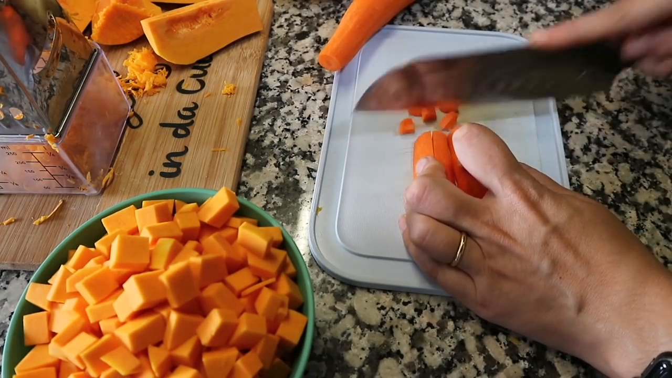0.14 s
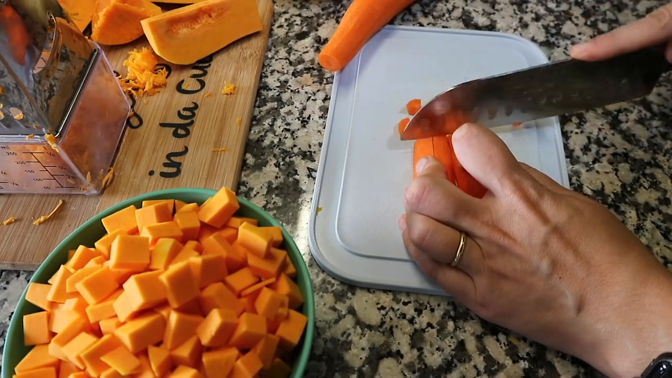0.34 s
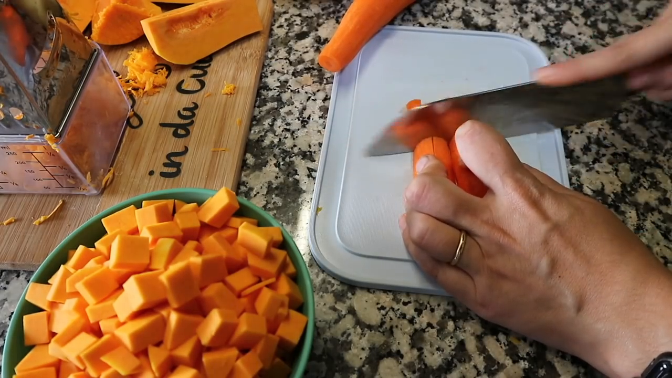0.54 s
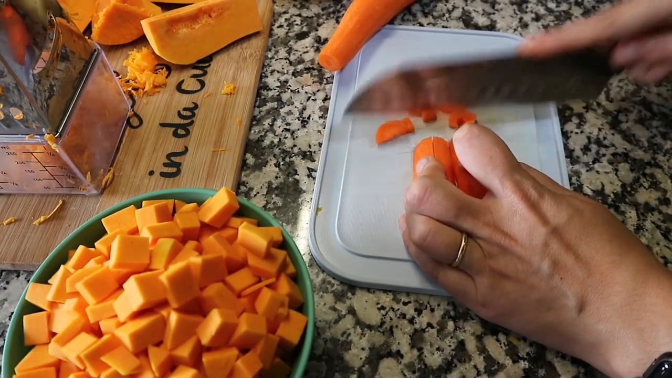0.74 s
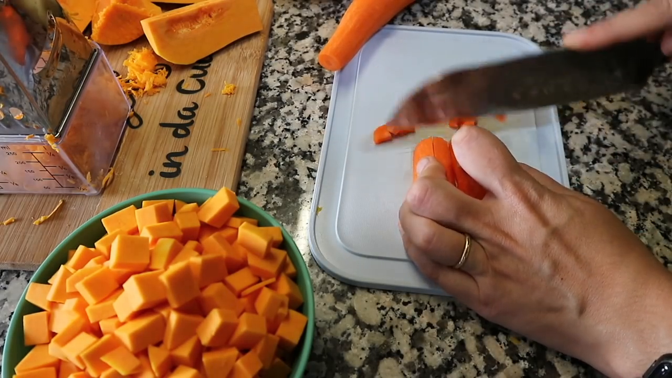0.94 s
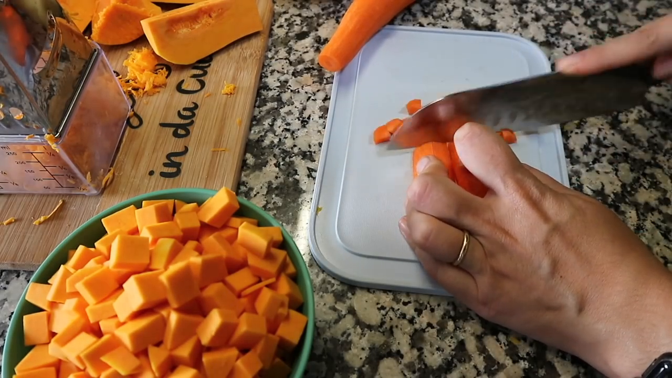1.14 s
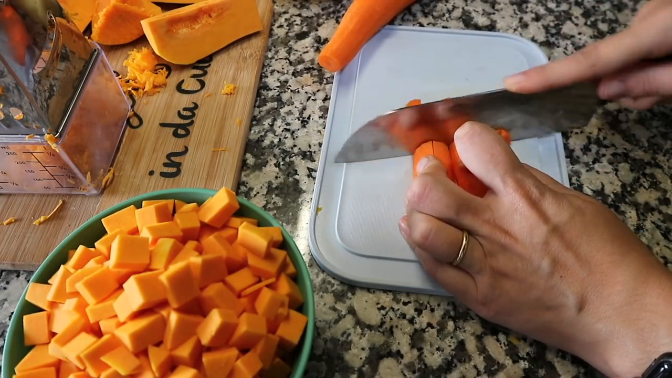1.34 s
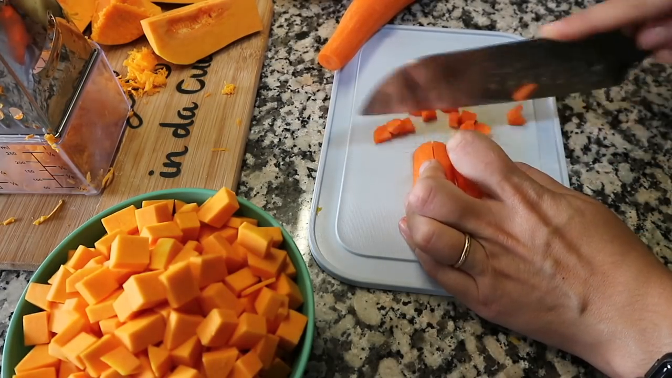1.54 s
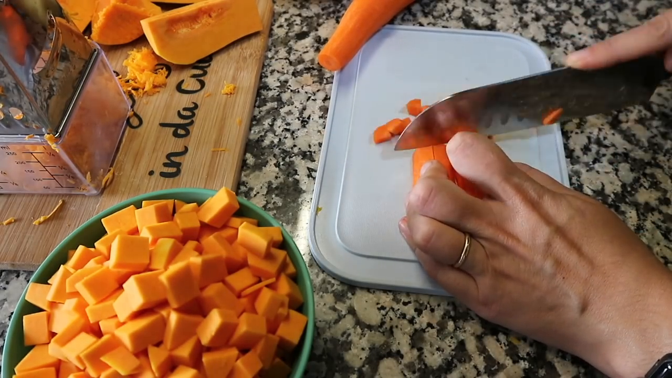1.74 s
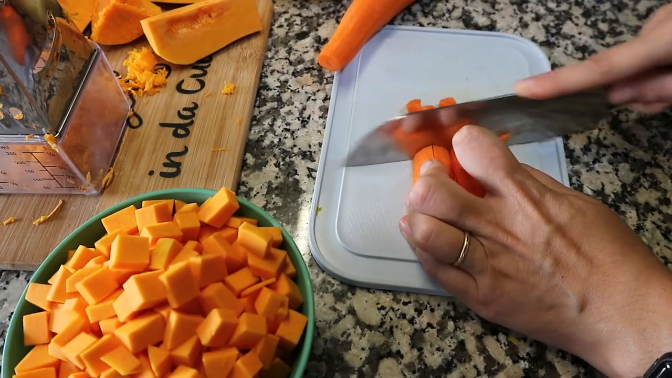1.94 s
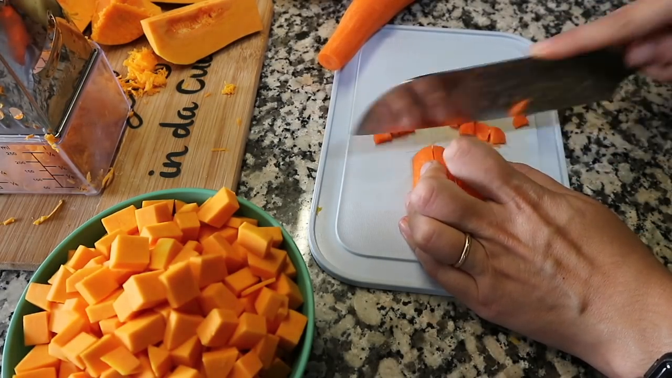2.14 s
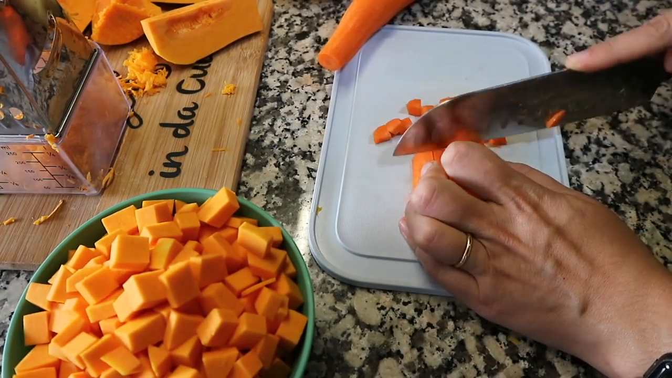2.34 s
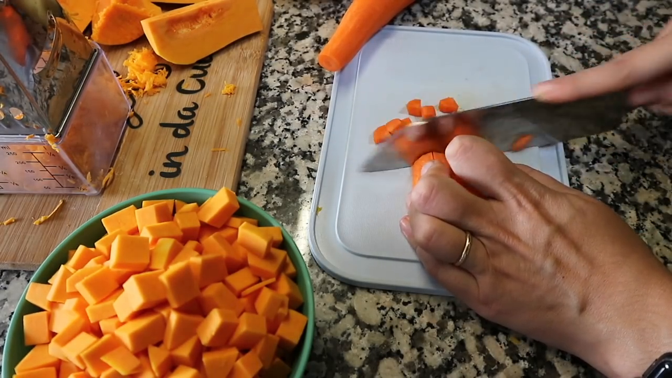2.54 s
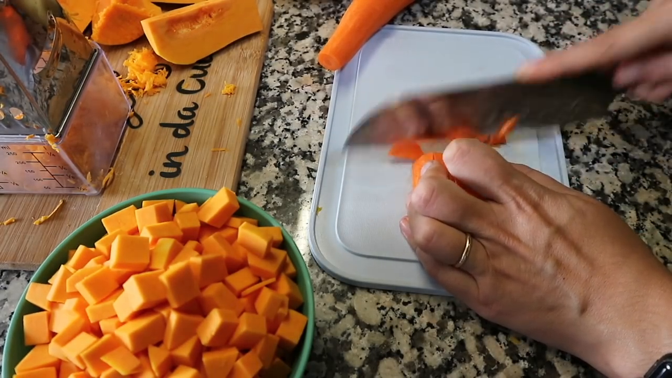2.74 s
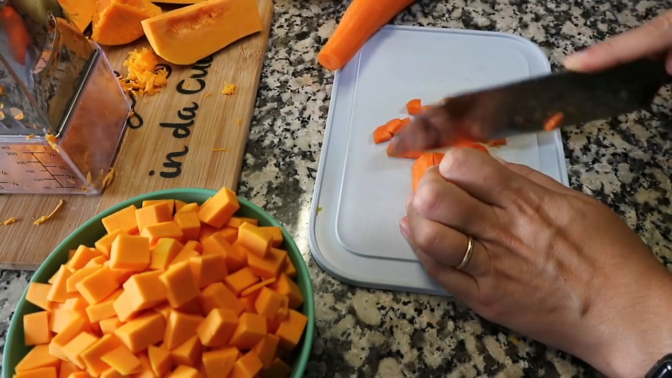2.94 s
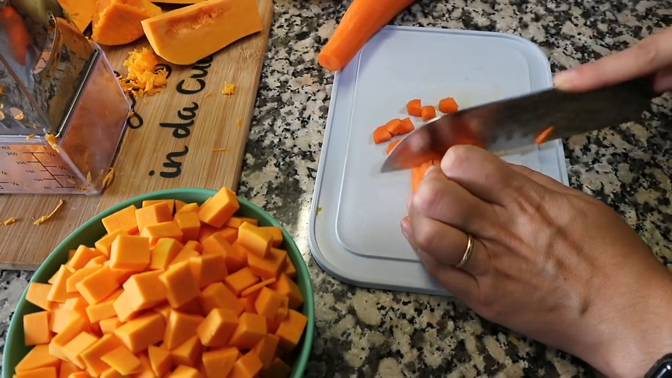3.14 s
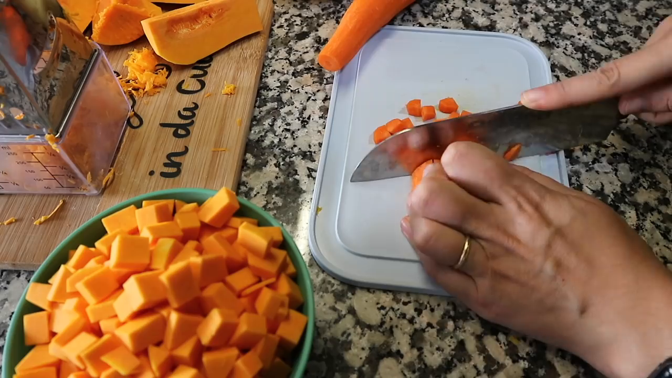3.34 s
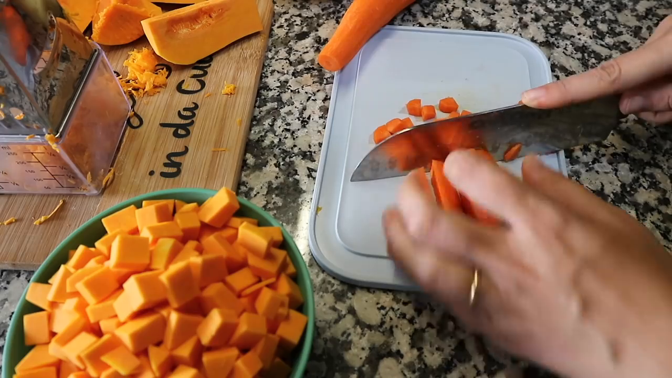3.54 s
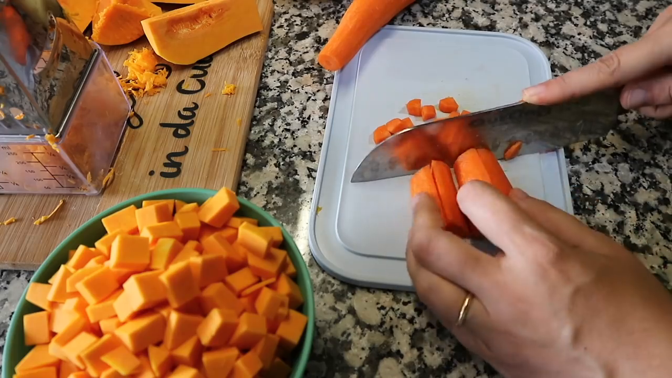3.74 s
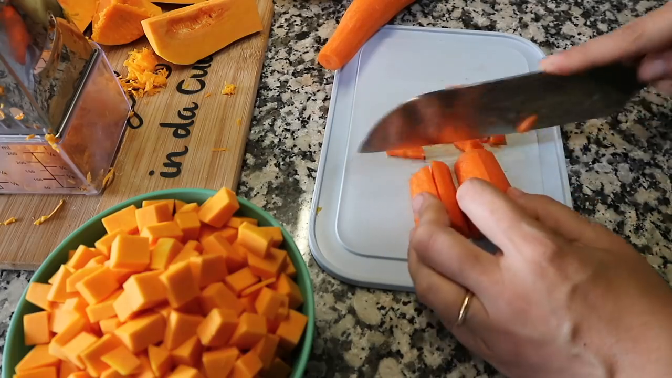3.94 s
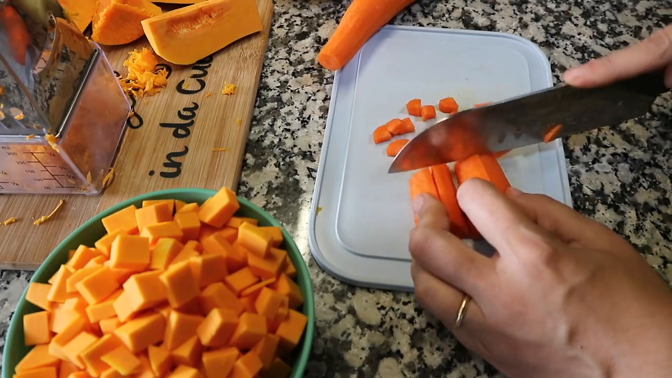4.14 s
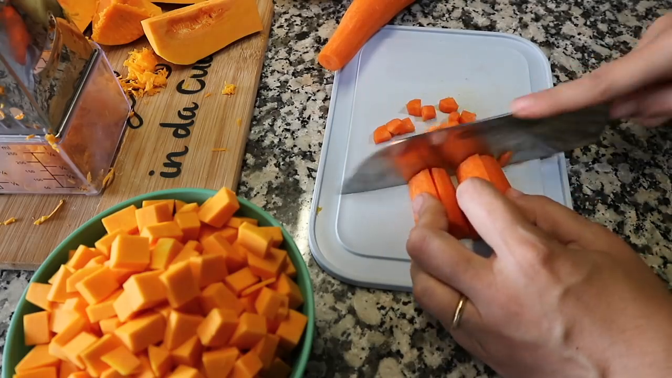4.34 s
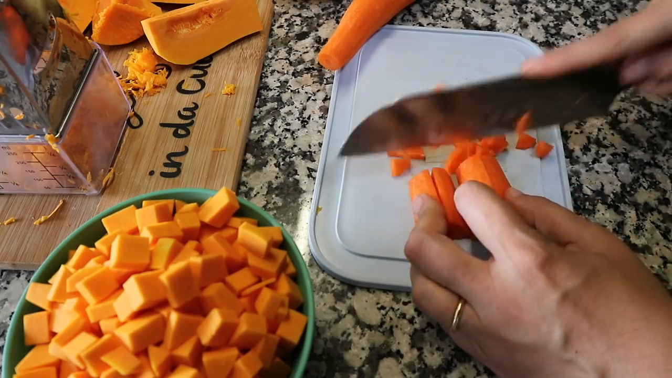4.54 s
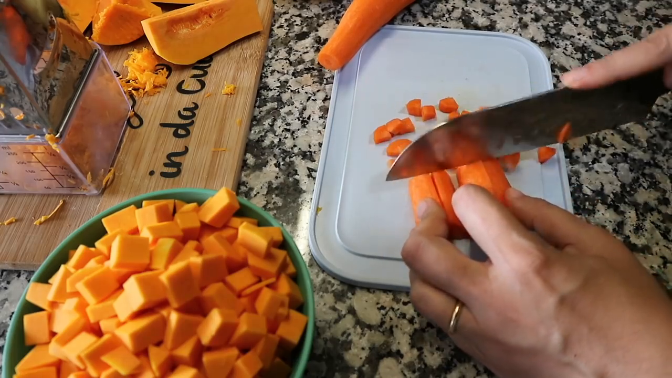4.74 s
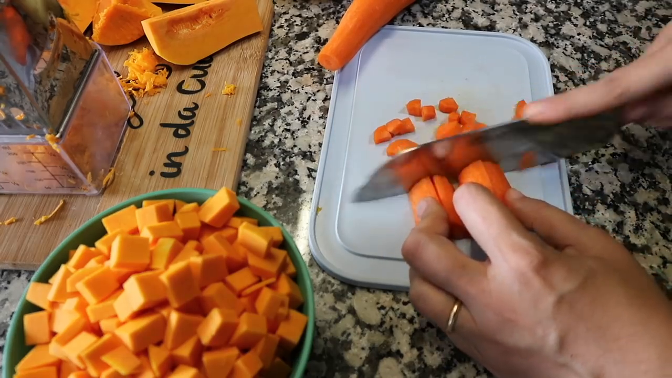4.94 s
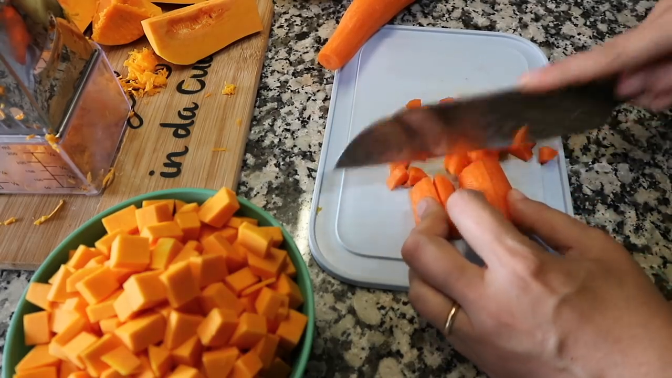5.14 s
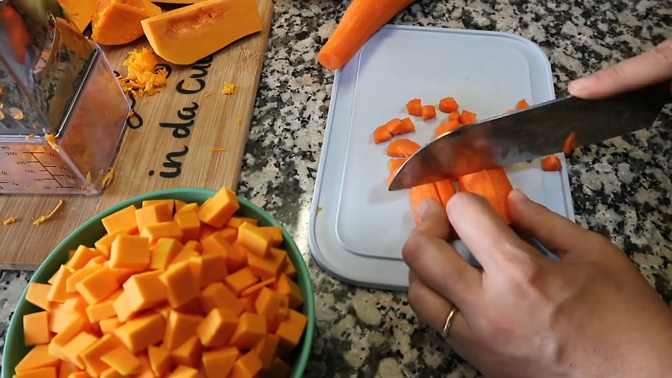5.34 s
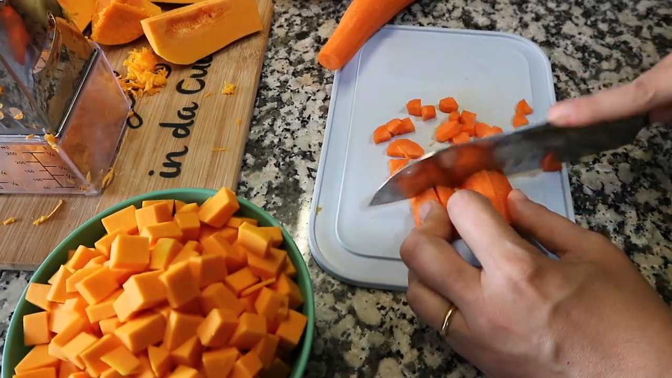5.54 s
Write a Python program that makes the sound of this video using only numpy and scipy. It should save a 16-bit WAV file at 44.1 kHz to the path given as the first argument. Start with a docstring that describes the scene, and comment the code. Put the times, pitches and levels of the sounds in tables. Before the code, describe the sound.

A sharp knock of a knife on a thin plastic cutting board opens the sound. Eight strokes through carrot follow at an even pace. In each, the blade lightly touches the carrot, crunches through it with rising loudness and clacks on the board. The knocks fall at about 0.6, 1.3, 1.9, 2.6, 3.3, 4.3 and 5.0 seconds; those at 0.6, 2.6 and 5.0 are the hardest, the one at 1.9 is softer. Fibres snap crisply near 1.9, 3.3 and 4.9 seconds, and the blade slides on briefly after 4.3. The last stroke crunches and snaps around 5.5 seconds and ends before its knock. The microphone is close, and the small, hard kitchen rings very briefly after each hit. Underneath, an appliance gives a low, slightly throbbing hum with a soft fan hiss throughout.

```python
"""A chef's knife rocks through carrot sticks on a thin plastic board lying on a stone counter.
A knock on the board opens the scene. Eight strokes follow: the edge touches the carrot, crunches through
ever louder, snaps fibres and knocks on the board, at times sliding on. The last ends before its knock.
Throughout, a small hard kitchen rings briefly, an appliance hums and its fan hisses.
Two close microphone ports listen; after loud knocks the gain drops and creeps back."""
import sys
import numpy as np
from scipy import signal
from scipy.fft import rfft, irfft, next_fast_len
from scipy.io import wavfile
from scipy.ndimage import uniform_filter1d

SR = 44100
rng = np.random.default_rng(int(sys.argv[2]) if len(sys.argv) > 2 else 0)


def generate_wav(sig):
    """Save sig (samples, or channels by samples) to the path in sys.argv[1] as 16-bit PCM at SR."""
    pcm = np.round(np.clip(np.atleast_2d(sig).T, -1, 1) * 32767).astype(np.int16)
    wavfile.write(sys.argv[1], SR, pcm)


N = 245718
RUN_IN = 8820   # samples before time zero
LONG = N + RUN_IN
FFT_SIZE = next_fast_len(LONG + SR // 2)
TIME_S = (np.arange(LONG) - RUN_IN) / SR
BIN_HZ = np.maximum(np.arange(FFT_SIZE // 2 + 1) * SR / FFT_SIZE, 1)

# Cuts. Each row: entry and board arrival in seconds, crunch at each in dB, final rush's share of the
# climb, fizz boost in dB, buzz at entry in dB, buzz tilt in dB per octave, slide level in dB.
STROKES = [(0.427, 0.566, -63.5, -19.5, 0.53, 1, -50, -4, -64),
           (1.112, 1.31, -55, -31, 0.4, 3.5, -46.5, -2, -78),
           (1.796, 1.93, -62, -27.5, 0.35, 1.5, -49, 9.5, -60),
           (2.413, 2.577, -59.5, -24, .5, 1, -52.5, 5, -62), (3.066, 3.272, -55, -25, .55, 1, -54, 1, -47),
           (4.17, 4.331, -56.5, -27, .4, 1, -54.5, -5, -36),
           (4.81, 4.98, -50.5, -25.5, 0.2, -1, -59.5, -9, -52),
           (5.42, 5.6, -48.5, -33, 0.33, -2.5, -61.5, -13, -60)]
# Bursting cells' spectrum. Each row: frequency in Hz, relative density in dB.
CRUNCH_SPECTRUM = [(1470, -19.5), (2500, -4), (3230, -12.5), (3510, -5.5), (5290, -12.5), (6320, -9),
                   (7850, -11), (13100, -19), (14900, -18), (15900, -27.5)]
# Board resonances under the cut. Each row: centre in Hz, width in Hz, gain in dB.
BUZZ_BANDS = [(1444.6, 124, 2.5), (1735, 160, 2), (2380, 350, -1), (910, 170, -7)]
# Edge hits board. Each row: start in seconds, level in dB, hardness in dB per octave, crack level in dB,
# lag of 1 kHz behind 4 kHz in ms, low-mode gain in dB, ring time as a share of the free board's.
KNOCKS = [(-.034, -9, -2, -13, 0.885, 3, 2), (.562, 2.5, 3, -28, 2.2, 8.5, 0.93),
          (1.305, -3.5, -3, -17.5, 0.9, 0.5, 0.85), (1.926, -14, -6.5, -20, 1.5, 1.5, 0.47),
          (2.580, 5, 2, -17.5, 0.758, -0.5, 0.72), (2.841, -24.5, -3.5, -55, 0.52, -2, .6),
          (3.274, -1, -1, -11, 0.715, -7.5, 1), (4.33, -5.5, -0.5, -15.5, 0.57, 3.5, .7),
          (4.445, -30, 2, -64, 0.5813, -3, 0.5), (4.974, 1.5, 1, -11.5, 0.565, -6, 0.97)]
# Impact spectrum before the hardness tilt. Each row: frequency in Hz, relative density in dB.
CLACK_SPECTRUM = [(200, -29.5), (400, 3), (640, 1.5), (1150, 3), (1550, 1.5), (2150, 1), (2700, -1),
                  (3600, -8), (5000, -29.5), (9000, -33.5), (16000, -45)]
# Free board's modes. Each row: frequency in Hz, gain in dB, T60 in seconds.
BOARD_MODES = [(322, -5, 0.043), (430.4, -4, 0.033), (621.5, -6, 0.086), (774, -3.5, 0.021),
               (967, -0.5, 0.02), (1230, -3.5, 0.052), (1492, -5, 0.04), (1689, 0.5, 0.082),
               (2100, -5, 0.038), (2504, -4.5, 0.039), (2804, -5.5, 0.036), (3457, -7, .02)]
# Edge lands on carrot. Each row: start in seconds, scrape peak in dB, blade pitch in Hz, tap gain in dB.
TOUCHES = [(0.368, -36.5, 3900, 10), (1.0458, -35.5, 6070, 11), (1.735, -37, 3966, 13),
           (2.349, -42.5, 3400, 11), (3.013, -41.5, 3100, 7), (3.7244, -49, 3075, 4),
           (4.0933, -43.5, 3500, 21), (4.7554, -35, 3400, 0), (5.3632, -33.5, 6260, -10)]
# Breaking fibres. Each row: start in seconds, nominal peak in dB.
SNAPS = [(0.5302, -22), (1.1288, -49), (1.8013, -40), (1.9066, -13), (1.9164, -14), (2.4379, -43),
         (3.2126, -31), (3.2405, -31), (3.2668, -4), (4.186, -36), (4.2904, -20), (4.8165, -37),
         (4.8991, -21.5), (4.911, -16), (4.9397, -19), (4.948, -10.5), (4.9569, -16), (5.434, -35),
         (5.5358, -12.5), (5.546, -17), (5.5585, -11)]
# Direct sound's phase at the ports. Each row: frequency in Hz, left lead in radians.
PORT_LEAD = [(1500, 0), (4000, -.2), (8000, -.9), (12000, -1.7), (16000, -2.6)]
# Direct sound's width. Each row: frequency in Hz, left-right correlation.
NEAR_CORRELATION = [(300, 0.95), (2400, 1), (4400, 0.82), (8000, 0.23), (15000, 0.27)]
# Kitchen decay. Each row: frequency in Hz, T60 in seconds.
ROOM_DECAY = [(250, 0.25), (660, 0.24), (1740, 0.27), (4590, 0.28), (12100, 0.24)]
# Reflections' spectrum. Each row: frequency in Hz, relative gain in dB.
ROOM_SPECTRUM = [(300, 5.5), (800, 3), (1700, 2.5), (3200, -1.5), (6000, -1.5), (14000, -0.5)]
# Reflections' width. Each row: frequency in Hz, left-right correlation.
ROOM_CORRELATION = [(60, 0.99), (130, 0.96), (290, 0.94), (640, 1), (1410, 0.98), (3100, 0.93),
                    (6820, 0.38), (15000, -0.51)]
# Set curve of the noise-like hum. Each row: time in seconds, pitch in Hz, level before the throb in dB.
HUM_CURVE = [(0.0, 120.2, -48), (0.06, 121, -37.5), (1.05, 125, -30.5), (1.13, 112.5, -49.5),
             (1.27, 131, -25), (1.49, 130, -37.5), (1.95, 120, -42), (2.0, 129, -35), (2.05, 126, -42),
             (2.09, 108.1, -54), (2.23, 125, -35.5), (2.37, 115, -34.5), (3.16, 113, -35),
             (3.37, 127, -45.5), (3.47, 109, -40), (3.85, 125, -42.5), (3.91, 113, -38), (4.24, 129, -43.5),
             (4.31, 122, -45), (5.04, 125.4, -36), (5.32, 117, -47.5), (5.37, 132, -43.5),
             (5.46, 124, -44.5), (5.57, 132, -43)]
# Fan noise spectrum. Each row: frequency in Hz, relative density in dB.
FAN_SPECTRUM = [(15, -71), (25, -31), (48, -25), (123, -5.5), (141, -9), (165, -18), (195, -15),
                (269, -20.5), (334, -21), (573, -25.5), (814, -21), (883, -24.5), (1290, -22.5),
                (2460, -35.5), (15900, -71)]
# Fan noise width. Each row: frequency in Hz, left-right correlation.
FAN_CORRELATION = [(60, 1.0), (130, 1.0), (290, 0.96), (640, 0.97), (1410, 0.97), (3100, 0.42),
                   (6820, -0.34), (15000, -0.72)]
# Appliance whines. Each row: centre in Hz, width in Hz, level in dB.
WHINES = [(823, 5.9, -54), (242.6, 8.3, -54), (15402, 5, -92.5)]


def cutting(entry_s=0.025, rush_s=0.032, slide_peak_s=0.036, fizz_hz=8000, buzz_follow=0.3):
    """The crunch swells as the blade speeds down and buzzes the board; the edge stops or slides on."""
    envelope, fizz_db, tilt_db = np.zeros((3, LONG))
    buzz_db = np.full(LONG, -60.)   # relative to the crunch
    for start_s, board_s, entry_db, board_db, rush, fizz, buzz_entry_db, tilt, slide_db in STROKES:
        on = (TIME_S >= start_s) & (TIME_S < board_s)
        t = TIME_S[on]
        climb = (1 - rush) * (t - start_s) / (board_s - start_s) + rush * np.exp((t - board_s) / rush_s)
        climb_db = (board_db - entry_db) * climb
        envelope[on] = amp(entry_db + climb_db) * np.minimum((t - start_s) / entry_s, 1)
        fizz_db[on], tilt_db[on] = fizz, tilt
        buzz_db[on] = buzz_entry_db - entry_db - (1 - buzz_follow) * climb_db
        slide = np.maximum(TIME_S - board_s, 0) / slide_peak_s
        envelope += amp(slide_db) * slide ** 2 * np.exp(1 - slide ** 2)
    clicks, crunch = bursting_cells(spread_db=2.0)
    crunch = treble_shelf(crunch, fizz_hz, fizz_db)   # juice and fine fibres
    buzz = sum(amp(db + tilt_db * np.log2(hz / 1900)) * unit_rms(resonance(clicks, hz, width_hz))
               for hz, width_hz, db in BUZZ_BANDS)
    clumps = amp(0.94 * drift(rate_hz=62) + 1.64 * drift(rate_hz=250))   # fibres give way in clumps
    return uniform_filter1d(envelope * clumps, 60) * (crunch + amp(buzz_db) * buzz)


def bursting_cells(spread_db):
    """Cells burst in dense, uneven clicks; returns them raw and coloured into a crunch."""
    clicks = amp(spread_db * np.minimum(rng.exponential(1, LONG), 5)) * rng.standard_normal(LONG)
    return clicks, unit_rms(filtered(clicks, amp(at_hz(CRUNCH_SPECTRUM))))


def knocks(low_modes_hz=680, crack_s=0.0012, clack_delay_s=0.00049):
    """Steel hits plastic: a crack, a clack spread into a falling chirp, modes detuned by the hand."""
    out, t = np.zeros(LONG), np.arange(4096) / SR
    bin_hz = np.maximum(np.arange(2049) * SR / 4096, 1)
    clack_octaves = np.log2(np.clip(bin_hz, 300, 4000) / 1200)
    free_hz, mode_db, t60_s = np.transpose(BOARD_MODES)[:, :, None]
    jitter = rng.standard_normal((len(KNOCKS), 2, 30))[:, :, :len(BOARD_MODES), None]
    for knock, (louder, detune) in zip(KNOCKS, jitter):
        start_s, db, hardness, crack_db, spread_ms, low_db, ring_share = knock
        # bending-wave speed grows as the root of frequency
        dispersion = 2 * spread_ms / 1000 * np.sqrt(1000)
        lag_cycles = dispersion * (2 * np.sqrt(bin_hz) - np.minimum(bin_hz, 4000) / np.sqrt(4000))
        magnitude = amp(at_hz(CLACK_SPECTRUM, bin_hz) + hardness * clack_octaves)
        clack = irfft(magnitude * np.exp(-2j * np.pi * (lag_cycles + bin_hz * clack_delay_s)))
        add(out, start_s, amp(db) * clack[:2048] / np.abs(clack).max())
        hz = free_hz * (1 + .02 * detune)
        age_s = np.maximum(t - dispersion * (1 / np.sqrt(hz) - 1 / np.sqrt(4000)), 0)
        onset_db = mode_db + hardness * np.log2(hz / 1200) + 2 * louder
        onset_db += low_db * (hz < low_modes_hz)   # set by how the board lies on the stone
        modes = amp(onset_db - 60 * age_s / (ring_share * t60_s)) * np.sin(2 * np.pi * hz * age_s)
        add(out, start_s, amp(db - 17.5) * modes.sum(0))
        burst = rng.standard_normal(len(t)) * np.exp(-t / crack_s)
        add(out, start_s, amp(crack_db) * resonance(burst, hz=8400, width_hz=5900))
    # a thin board radiates no bass
    return signal.sosfilt(signal.butter(2, 280, "high", fs=SR, output="sos"), out)


def touches(crunch, crest_db=10.5, attack_s=0.0016):
    """The landing edge scrapes the carrot, tings the blade and taps the board."""
    scrape, rings = np.zeros((2, LONG))
    t = np.arange(2600) / SR
    shape = np.minimum(t / attack_s, 1) * (np.exp(-(t / 0.0079) ** 2) + 0.32 * np.exp(-t / 0.059))
    for start_s, peak_db, blade_hz, tap_db in TOUCHES:
        envelope = amp(peak_db - crest_db) * shape
        ting = resonance(envelope * rng.standard_normal(len(t)), blade_hz, width_hz=250)
        tap = resonance(envelope * rng.standard_normal(len(t)), hz=2000, width_hz=900)
        add(scrape, start_s, envelope)
        add(rings, start_s, amp(11) * ting + amp(tap_db) * tap)
    return rings + scrape * crunch


def snaps(crunch, crest_db=7, decay_s=0.002):
    """Fibres break in bursts of a few milliseconds."""
    envelope, t = np.zeros(LONG), np.arange(2600) / SR
    for start_s, peak_db in SNAPS:
        add(envelope, start_s, amp(peak_db - crest_db) * np.exp(-t / decay_s))
    return envelope * crunch


def microphone_ports(x):
    """Near sound reaches each port with its own phase, scattered by hand and bowl."""
    scatter = rng.standard_normal(400) * np.exp(-np.arange(400) / 130)
    scattered = filtered(x, rfft(scatter / np.linalg.norm(scatter), FFT_SIZE))
    left, right = stereo(x, scattered, NEAR_CORRELATION)
    half_lead = np.exp(.5j * at_hz(PORT_LEAD))
    return np.array([filtered(left, half_lead), filtered(right, 1 / half_lead)])


def kitchen(x, delay_s=0.003, build_s=0.0013):
    """Dense reflections build fast and die band by band."""
    t, edges_hz = np.arange(SR // 2) / SR, 150 * 2 ** np.arange(0, 7.1, .5)
    tails = 0
    for low_hz, high_hz in zip(edges_hz, edges_hz[1:]):
        hz = np.sqrt(low_hz * high_hz)
        bandpass = signal.butter(2, [low_hz, high_hz], "band", fs=SR, output="sos")
        band = signal.sosfilt(bandpass, rng.standard_normal((2, len(t))))
        tails += band * amp(at_hz(ROOM_SPECTRUM, hz) - 60 * t / at_hz(ROOM_DECAY, hz))
    tails *= np.clip((t - delay_s) / build_s, 0, 1)
    mid, side = filtered(x, rfft(tails / np.linalg.norm(tails[0]), FFT_SIZE))
    return stereo(mid, side, ROOM_CORRELATION)


def hum(throb_depth=0.54, throb_hz=8.5, left_lead_rad=0.08):
    """A low, noise-like hum near 120 Hz; pitch and level follow a set curve, a random throb on top."""
    times_s, pitch_hz, db = np.transpose(HUM_CURVE)
    phase = 2 * np.pi * np.cumsum(np.interp(TIME_S, times_s, pitch_hz)) / SR
    envelope = amp(np.interp(TIME_S, times_s, db)) * (1 + throb_depth * drift(throb_hz))
    return np.sqrt(2) * envelope * np.sin(phase + left_lead_rad / 2 * np.array([[1], [-1]]))


def fan(gain_db=-36.5, treble_db=-2, flicker_db=1.7):
    """The fan's air noise; its treble flickers."""
    air = stereo(*rng.standard_normal((2, LONG)), FAN_CORRELATION)
    air = filtered(air, amp(at_hz(FAN_SPECTRUM)))
    shelf_db = treble_db + flicker_db * drift(rate_hz=24)
    return amp(gain_db) / np.std(air) * treble_shelf(air, 1600, shelf_db)


def whines():
    """The appliance's faint tones: narrow bands of noise."""
    return sum(amp(db) * unit_rms(resonance(rng.standard_normal(LONG), hz, width_hz))
               for hz, width_hz, db in WHINES)


def amp(db):
    """Decibels to gain."""
    return 10 ** (np.asarray(db) / 20)


def unit_rms(x):
    """Scale to RMS 1."""
    return x / np.sqrt(np.mean(x ** 2) + 1e-20)


def at_hz(table, hz=BIN_HZ):
    """Interpolate a table over log frequency."""
    points_hz, values = np.transpose(table)
    return np.interp(np.log(hz), np.log(points_hz), values)


def filtered(x, response):
    """Apply a frequency response."""
    return irfft(rfft(x, FFT_SIZE) * response, FFT_SIZE)[..., :LONG]


def treble_shelf(x, corner_hz, gain_db):
    """Time-varying gain above a corner."""
    return x + (amp(gain_db) - 1) * filtered(x, 1 / (1 + (corner_hz / BIN_HZ) ** 4))


def drift(rate_hz, hop=40):
    """Low-passed noise of RMS 1."""
    pole = np.exp(-2 * np.pi * hop * rate_hz / SR)
    noise = rng.standard_normal(LONG // hop + 2002)
    slow = signal.lfilter([1], [1, -2 * pole, pole ** 2], noise)[2000:]
    return np.interp(np.arange(LONG) / hop, np.arange(len(slow)), unit_rms(slow))


def resonance(x, hz, width_hz):
    """Two-pole band-pass, peak gain 1."""
    r = np.exp(-np.pi * width_hz / SR)
    gain = (1 - r * r) / 2
    return signal.lfilter([gain, 0, -gain], [1, -2 * r * np.cos(2 * np.pi * hz / SR), r * r], x)


def add(out, start_s, piece):
    """Mix a piece in at a time."""
    i = round(start_s * SR) + RUN_IN
    out[i:i + len(piece)] += piece[:LONG - i]


def stereo(mid, side, correlation_table):
    """Mix two unrelated signals to left and right with a correlation per frequency."""
    correlation = np.clip(at_hz(correlation_table), -1, 1)
    mid = filtered(mid, np.sqrt((1 + correlation) / 2))
    side = filtered(side, np.sqrt((1 - correlation) / 2))
    return np.array([mid + side, mid - side])


def scene(room_db=-6):
    """Knife work, its reflections and the appliance."""
    cuts = cutting()
    _, coarse_crunch = bursting_cells(spread_db=4.5)
    knife = cuts + touches(coarse_crunch) + snaps(coarse_crunch) + knocks()
    mix = microphone_ports(knife) + amp(room_db) * kitchen(knife) + hum() + fan() + whines()
    return mix[:, RUN_IN:]


def record(dry):
    """Loud knocks pull the gain down and it creeps back; peaks overload softly; the top is cut."""
    threshold_db, duck_share, attack_s, recover_db_per_s = -17, 0.63, 0.023, 4
    ceiling, cutoff_hz = 1.2, 16050
    power = uniform_filter1d(np.mean(dry ** 2, axis=0), size=512, origin=255)
    duck_db = duck_share * np.maximum(10 * np.log10(power + 1e-12) - threshold_db, 0)
    creep_db = recover_db_per_s * np.arange(N) / SR
    held_db = np.maximum.accumulate(duck_db + creep_db) - creep_db
    pole = np.exp(-1 / (attack_s * SR))
    ducked = dry * amp(-signal.lfilter([1 - pole], [1, -pole], held_db))
    limited = ducked / (1 + np.abs(ducked / ceiling) ** 4) ** .25
    return signal.sosfilt(signal.cheby2(16, 45, cutoff_hz, fs=SR, output="sos"), limited)


dry = scene()
out = record(dry)
generate_wav(out)
```